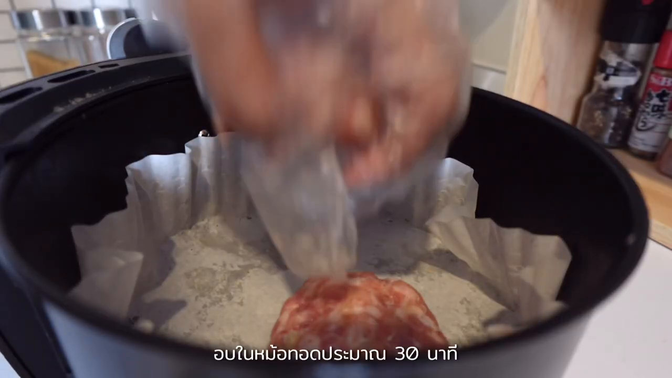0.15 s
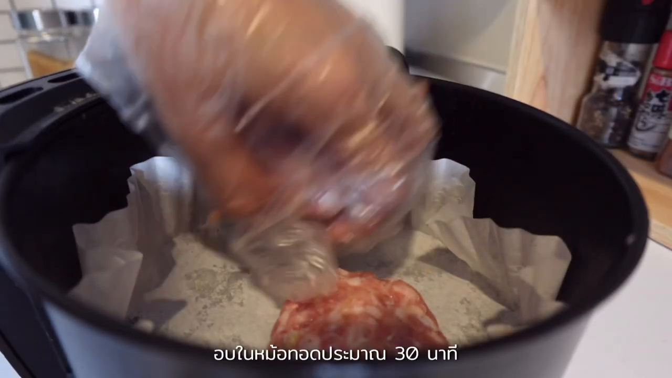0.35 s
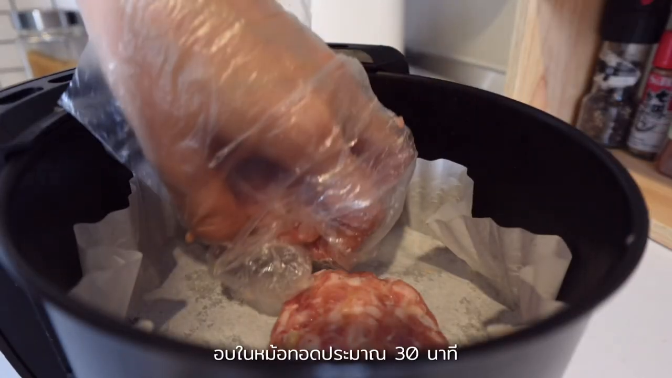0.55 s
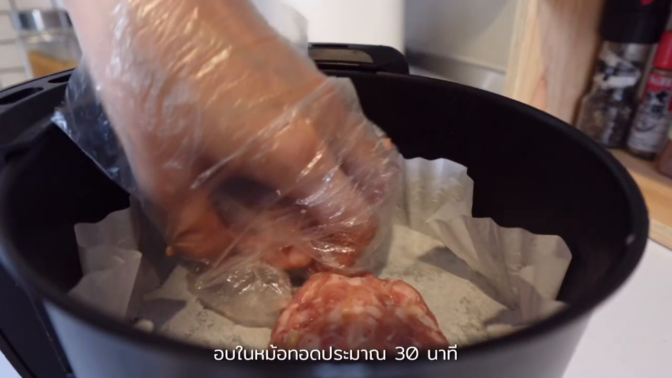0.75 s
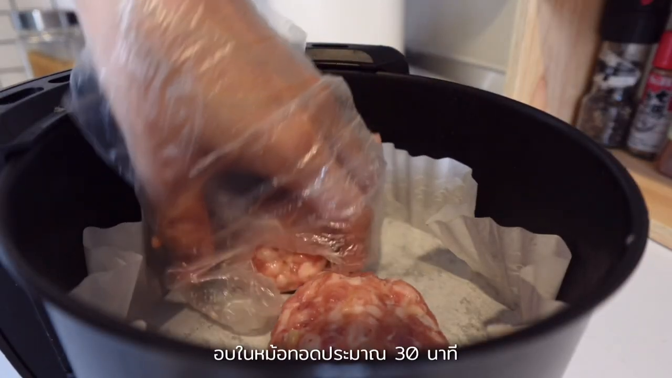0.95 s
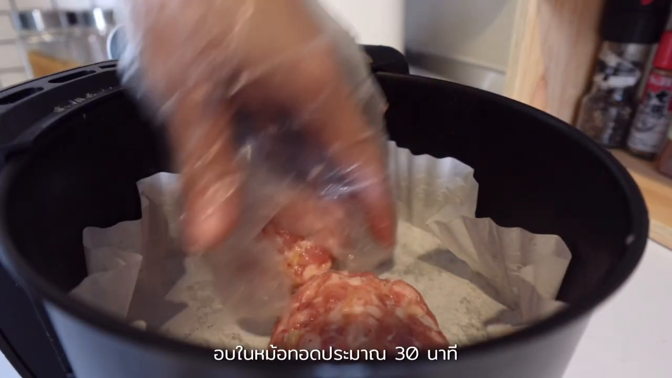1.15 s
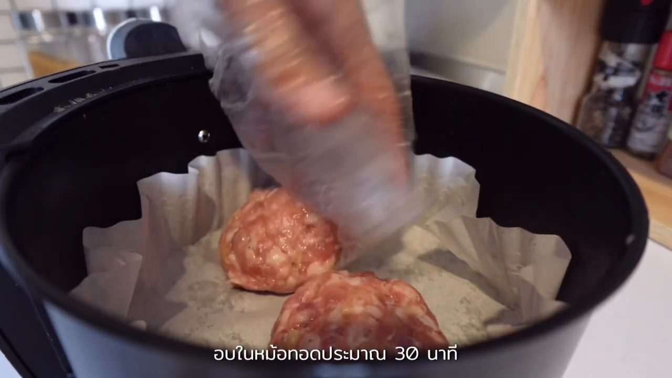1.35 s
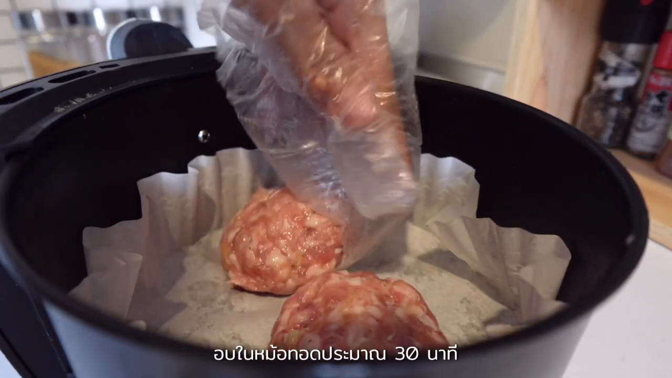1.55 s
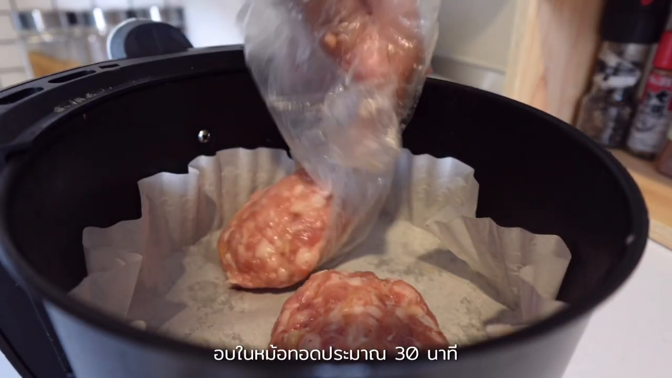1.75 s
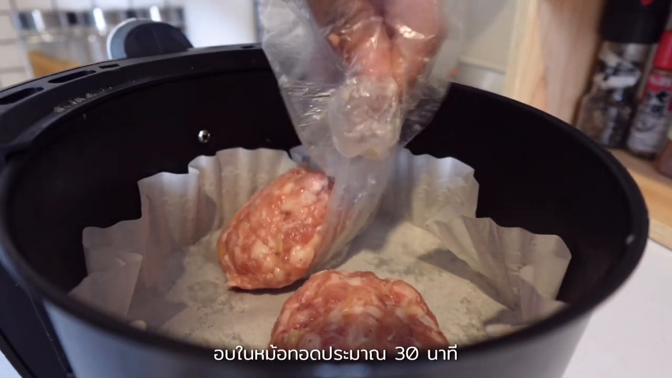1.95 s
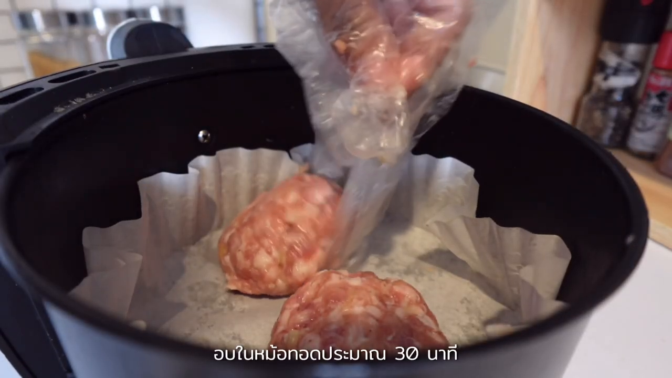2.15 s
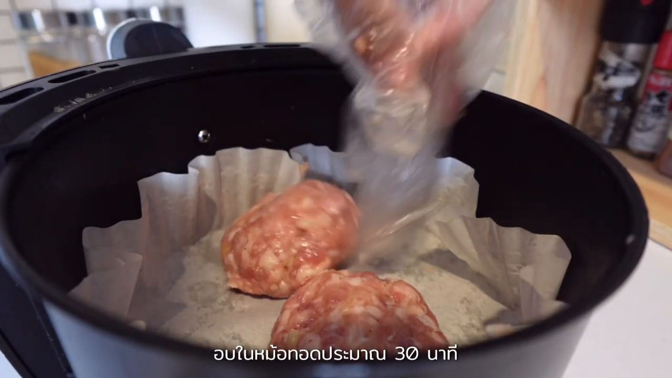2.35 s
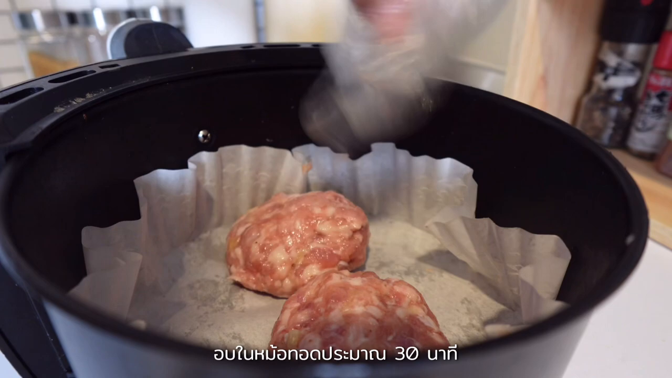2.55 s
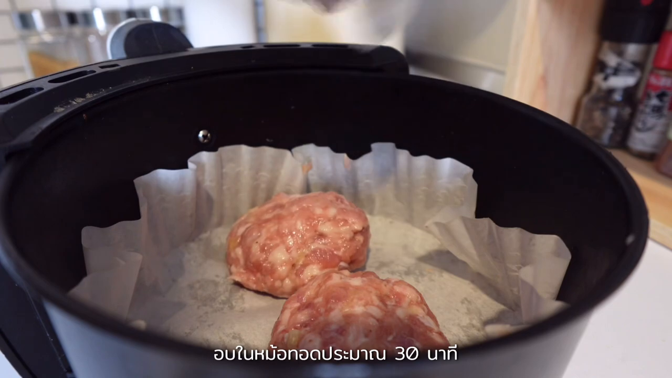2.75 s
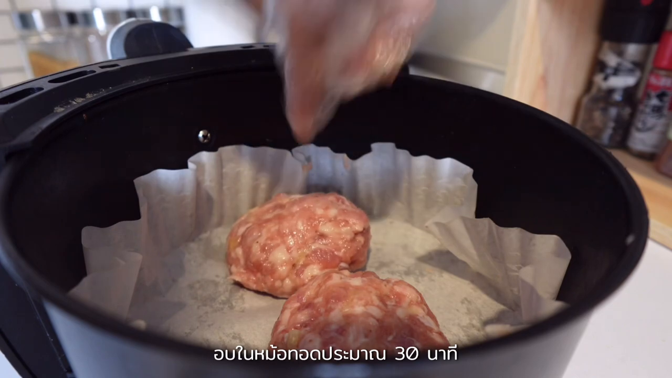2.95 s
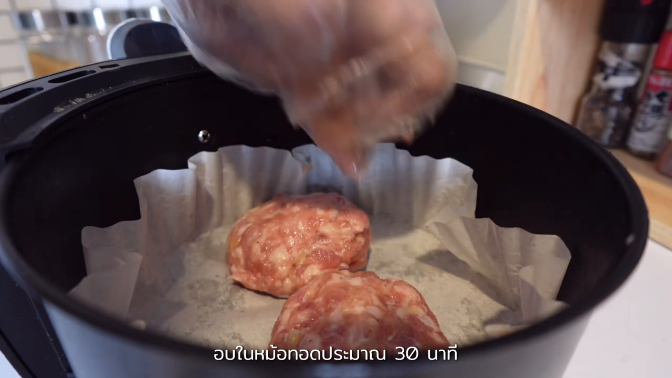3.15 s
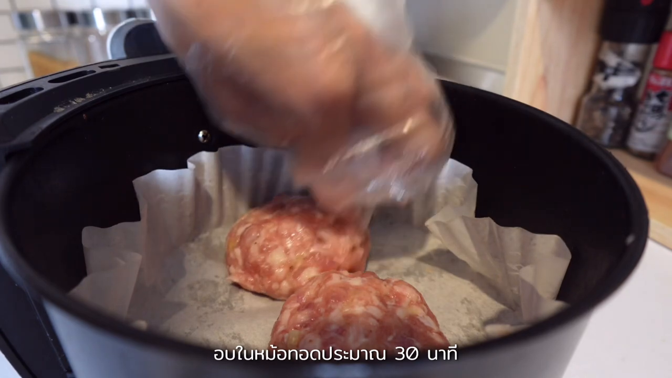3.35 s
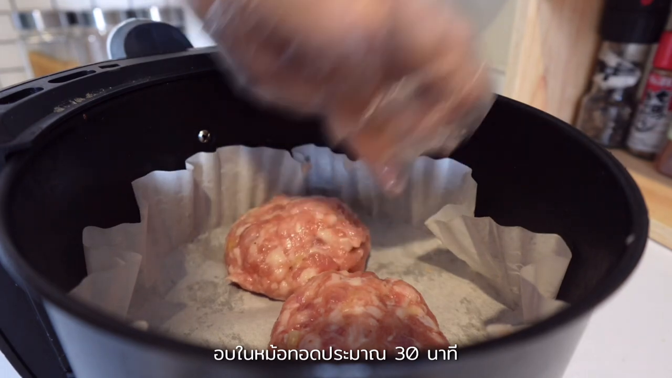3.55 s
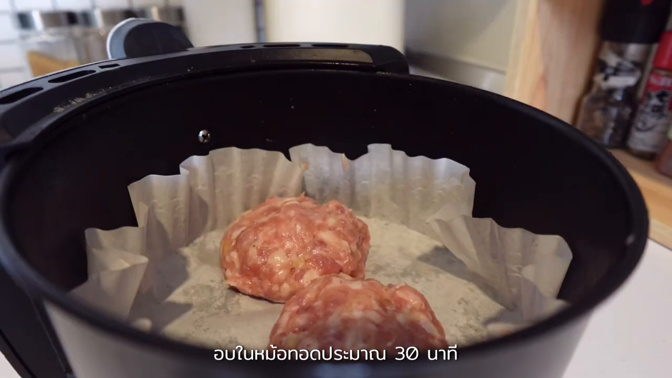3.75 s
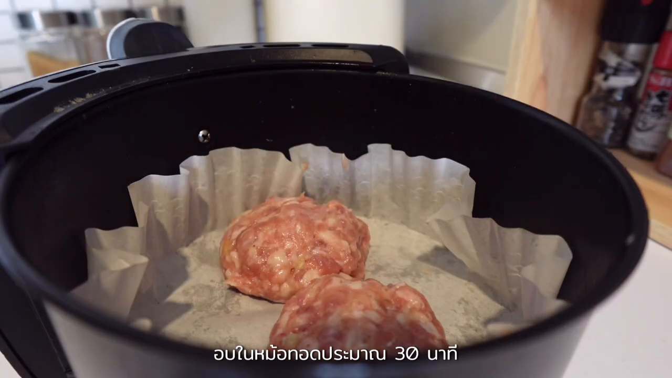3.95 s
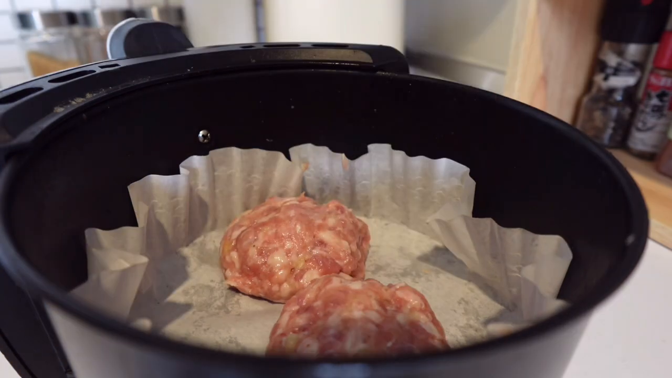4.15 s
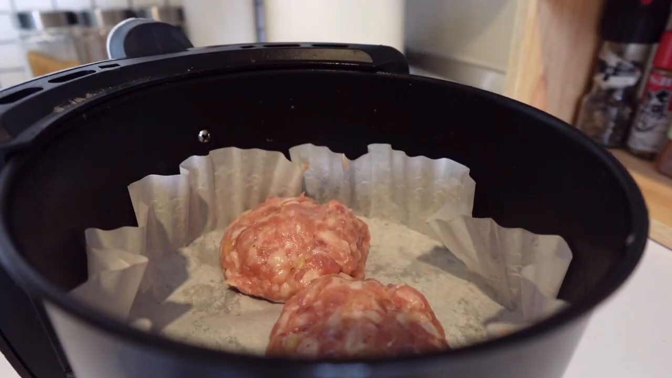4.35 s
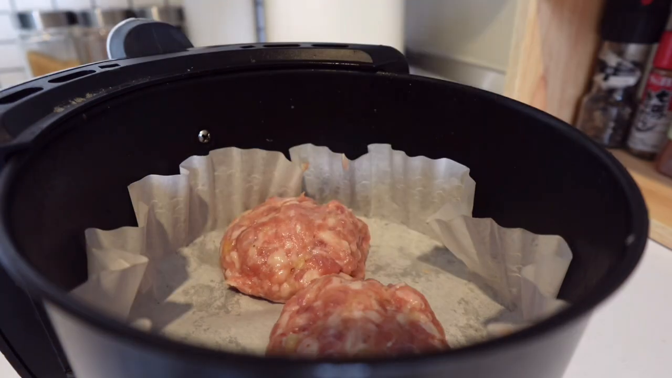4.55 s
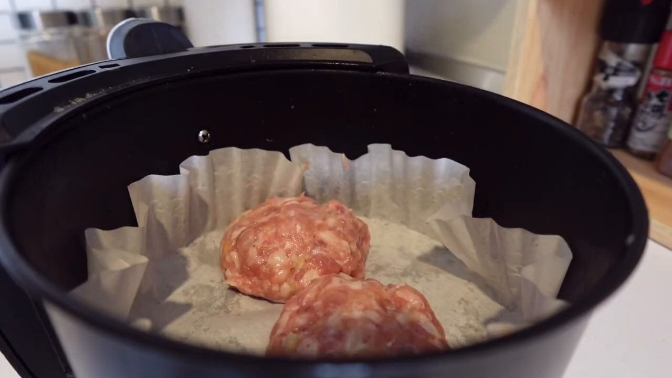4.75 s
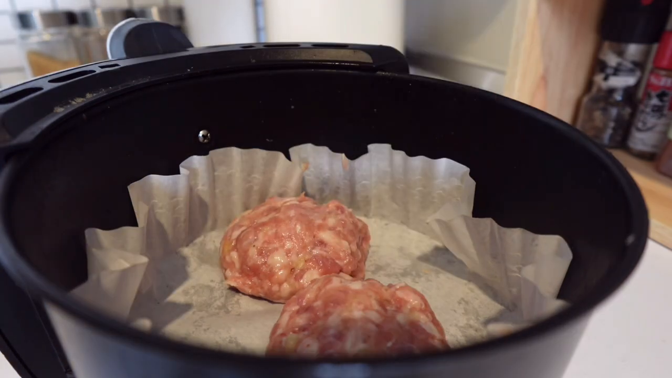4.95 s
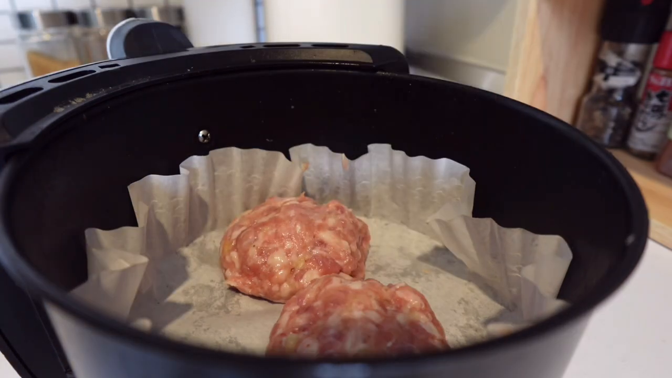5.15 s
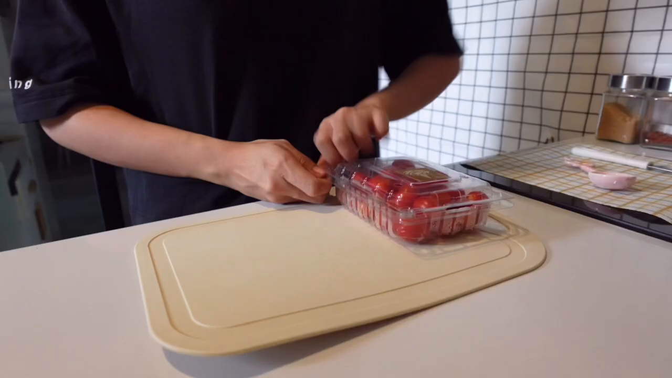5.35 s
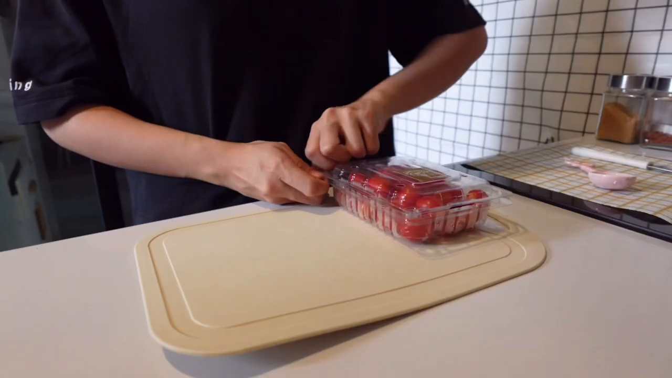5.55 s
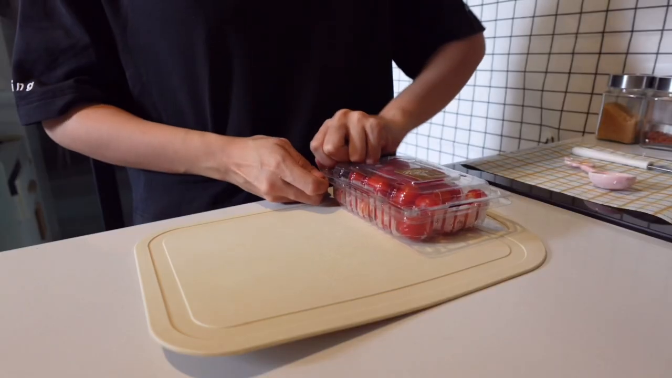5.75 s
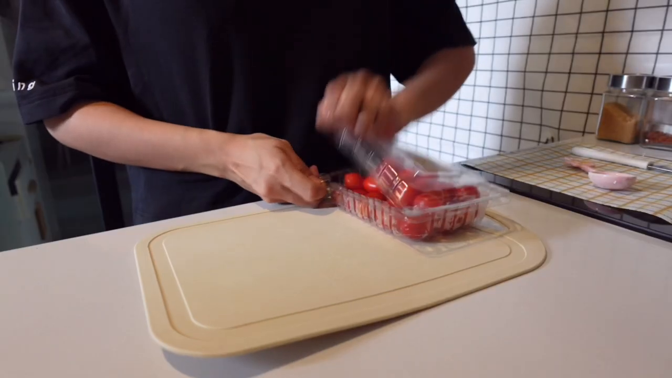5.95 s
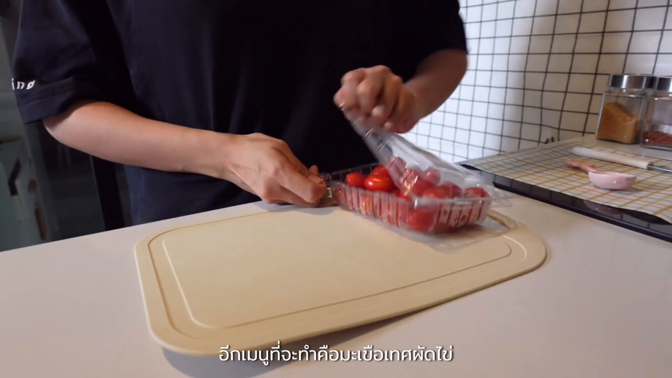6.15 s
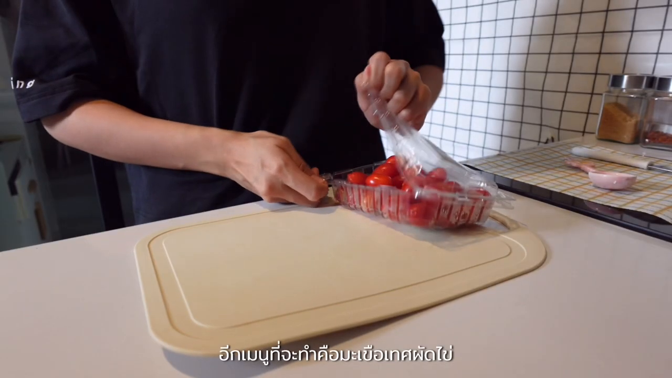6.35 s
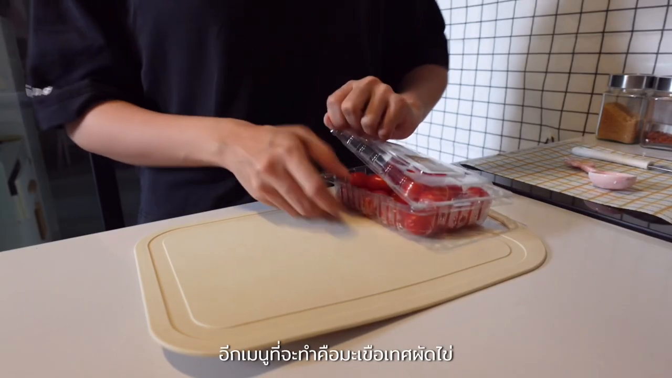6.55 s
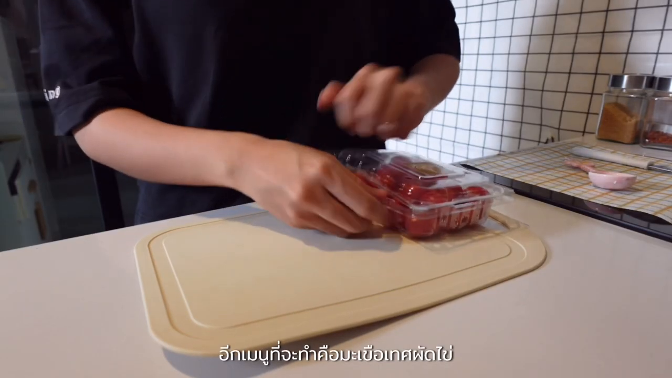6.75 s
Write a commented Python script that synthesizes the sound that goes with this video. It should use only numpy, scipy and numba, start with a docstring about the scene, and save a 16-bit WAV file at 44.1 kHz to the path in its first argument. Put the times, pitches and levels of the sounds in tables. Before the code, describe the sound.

Thin plastic gloves crinkle softly over a kitchen hum, then a plastic box is opened with loud, sharp pops and clicks.

```python
"""First a hand in a thin plastic glove sets a meatball on baking paper in an air-fryer pot. The plastic
crinkles as it buckles, folds snap, and the hand pulls away, leaving only the humming kitchen.
At about 5.4 seconds the scene changes to a noisier one: a plastic box of tomatoes is popped open,
its lid is creased back and dropped shut, and the tomatoes bump inside. The box sets the tiled room
ringing; a limiter turns down the loudest pops, so the echo swells up behind them."""
import sys
import numpy as np
from scipy import signal
from scipy.fft import rfft, irfft
from scipy.io import wavfile
from scipy.ndimage import uniform_filter1d, minimum_filter1d
from numba import njit

SR = 44100
rng = np.random.default_rng(int(sys.argv[2]) if len(sys.argv) > 2 else 0)


def pcm_store(signal):
    """Save signal as 16-bit PCM."""
    levels = np.round(np.clip(np.atleast_2d(signal), -1, 1) * 32767)
    wavfile.write(sys.argv[1], SR, levels.astype(np.int16).T)


N = 304290
T = np.arange(N) / SR
HZ = np.maximum(np.arange(N // 2 + 1) * SR / N, 1)

# The hand reaches in, sets the meat down, lets go and leaves. Each row: time in seconds, level in dB.
RUSTLE_LEVELS = [(0, -51), (.22, -50.5), (.3, -42), (.41, -41), (.53, -47.5), (.78, -40.5), (.845, -34.5),
                 (.9, -42.5), (.99, -43.5), (1.14, -39), (1.44, -45.5), (1.66, -40), (1.76, -47),
                 (2.27, -46.5), (2.35, -38.5), (2.48, -41.5), (2.54, -35), (2.84, -37), (2.88, -39.5),
                 (3.26, -56.5), (3.36, -50), (3.64, -68.5), (4, -100)]
# Fingers rub off sticky meat. Each row: time in seconds, level in dB.
FINGER_RUBS = [(1.49, -47), (1.645, -45), (1.895, -44), (1.97, -45), (2.07, -46), (2.185, -44),
               (2.815, -33), (2.945, -42.5), (3.115, -46.5), (3.69, -62), (3.735, -54.5)]
# Dragging on meat and paper adds low tones. Each row: time in seconds, dB relative to the rustle.
DRAG_LEVELS = [(0, -12), (.2, -5), (.88, -2), (1.65, -4), (1.85, -7.5), (2.35, -7.5), (2.41, -2),
               (2.56, -9.5), (3.1, -9.5), (3.4, 0.5), (3.6, -9)]
# Single wrinkles stand out of a slow rustle. Each row: rustle level in dB, wrinkles' relative dB.
WRINKLE_SHARE = [(-56, -7.5), (-40, -18)]
# The tone of the plastic film. Each row: frequency in Hz, relative level in dB.
FILM_TONE = [(180, -49), (300, -6), (343, -7.5), (470, -12.5), (565, -9.5), (994, -7.5), (1340, -2.5),
             (1690, -1.5), (2280, 0), (3460, -0.5), (6850, -2), (14500, -3.5), (16000, -11)]
# The air in the pot rings. Each row: pitch in Hz, width in Hz, boost in dB.
POT_RESONANCES = [(570, 57, 4), (1355, 86, 4), (2080, 450, 3)]


def glove_rustle(let_go_s=1.055, slacken_s=0.1, taut_db=-4, slack_db=0.53, rub_s=0.018):
    """Thin film buckles: it is dull while stretched around the meat and sizzles once it hangs slack."""
    rub_power = sum(undb(db) ** 2 * np.exp(-((T - s) / rub_s) ** 2) for s, db in FINGER_RUBS)
    effort = np.sqrt(gain_curve(RUSTLE_LEVELS) ** 2 + rub_power)
    released = np.clip((T - let_go_s) / slacken_s, 0, 1)
    fine = unit(crinkle(rate=20000, spread_db=0.75, clump_db=1.23, clump_s=0.007))
    wrinkles = unit(crinkle(rate=130, spread_db=-1.5, clump_db=5.0, clump_s=0.064))
    share = undb(np.interp(20 * np.log10(effort), *np.transpose(WRINKLE_SHARE)))
    film = colour((fine + share * wrinkles) / np.hypot(1, share), FILM_TONE, POT_RESONANCES)
    body = unit(band(film, 403, 2090, order=3)) * gain_curve(DRAG_LEVELS)
    middle = unit(band(film, 2388, 7060, order=3))
    sizzle = unit(band(film, 6980, 16000, order=3)) * undb(taut_db + (slack_db - taut_db) * released)
    rustle = (middle - body - sizzle) * effort
    return rustle + pot_echo(rustle, released)


def pot_echo(x, lifted, delay_s=0.001454, deep_gain=0.17, lifted_gain=0.053):
    """The pot wall sends sound straight back, making it hollow; less so once the hand lifts."""
    return (deep_gain + (lifted_gain - deep_gain) * lifted) * np.interp(T - delay_s, T, x)


# Folds in the glove and paper. Each row: start in seconds, level in dB, pitch in Hz.
FOLD_SNAPS = [(.829, -17.5, 2700), (.8436, -12.5, 2980), (.854, -12.5, 2900), (.8655, -16, 1700),
              (.9535, -25, 3300), (1.7215, -18, 1710), (1.7223, -18, 4530), (1.955, -21, 7050),
              (2.4621, -15, 1900), (2.465, -16, 3900), (2.804, -25, 2640), (2.836, -20, 2800),
              (3.4125, -23.5, 2100), (3.569, -38, 4500), (3.6855, -35, 5530), (3.729, -29.5, 4300)]


def fold_snaps(ring_cycles=55, crack_db=-4):
    """Folds snap through inside the pot; small, high ones die away soonest."""
    snaps = np.zeros(N)
    for s, db, hz in FOLD_SNAPS:
        t60 = ring_cycles / hz
        narrow = burst(hz * 0.81, hz * 1.26, t60)
        wide = burst(hz * 0.2, hz * 2.2, t60)
        add(snaps, s, undb(db) * (narrow + 0.72 * wide))
        add(snaps, s, undb(db + crack_db) * crack(hz * 0.5, hz * 3.9, lag_s=0.000632))
    return colour(snaps, [(300, -23), (600, -3), (950, -7), (1500, -5), (16000, -1.0)], POT_RESONANCES)


def squeak(start_s=3.61, length_s=0.054, hz=2100, db=-54):
    """A brief, faint rubbing squeak."""
    envelope = np.interp(T, [start_s, start_s + length_s / 5, start_s + length_s], [0, 1, 0])
    return undb(db) * envelope * unit(band(rng.standard_normal(N), hz * 0.91, hz * 1.07))


# The notes of the box's shell. Each row: base pitch in Hz, relative level in dB, fade time in seconds.
SHELL_NOTES = [(298, -25, 0.045), (407, -13.5, 0.009), (724, -27, 0.0036), (1179, -6, 0.039),
               (1257, -1.5, 0.036), (1335, -3.5, 0.036), (1660, -7, 0.024), (2247, -4, 0.019),
               (2395, 0.5, 0.01), (3390, -6, 0.02)]
# Pops of the box. Each row: start in seconds, level in dB, the crack's relative dB,
# contact time in seconds, pitch multiplier from the shell's tension.
BOX_POPS = [(5.577, -2, 3.5, 0.00022, 0.97), (5.9054, -7, 15.5, 0.00019, 1.04),
            (6.7205, -13, -32, 0.0003, 1.03), (6.7226, -15, 0.5, 0.0012, 0.93)]


def box_pops():
    """The whole shell flexes and rings as a catch lets go or the lid lands; short contacts are brighter."""
    out = np.zeros(N)
    for s, db, crack_db, contact_s, tension in BOX_POPS:
        shell = sum((-1) ** k * undb(note_db) * ring(hz * tension, t60) / np.hypot(1, hz * contact_s)
                    for k, (hz, note_db, t60) in enumerate(SHELL_NOTES))
        add(out, s, undb(db) * (shell + undb(crack_db) * shell_crack(1 / contact_s)))
    return out


def shell_crack(cutoff_hz):
    """The shell's crowded high notes blur into one short crack, weaker above the cutoff."""
    low_pass = signal.butter(1, min(cutoff_hz, SR / 4), fs=SR, output="sos")
    sound = signal.sosfilt(low_pass, crack(750, 12500, lag_s=0.0026))
    return sound / np.abs(sound).max()


# Creases in the lid. Each row: start in seconds, level in dB, pitch in Hz.
LID_CREASES = [(5.371, -26.5, 2630), (5.405, -35, 7200), (5.5528, -19, 5260), (5.576, -10, 7300),
               (5.656, -21, 6800), (5.686, -16.5, 7100), (5.8778, -9.5, 2910), (5.8767, -9, 5000),
               (6.198, -5, 3520), (6.2636, 1, 4190), (6.3845, -20, 5520), (6.4775, -21.5, 3140),
               (6.7295, -16.5, 8250), (6.8648, -31, 3470)]


def lid_creases(ring_cycles=23, db_per_octave=7.5):
    """Each crease clicks over and rings one panel: small panels crack more, hard snaps ring more."""
    out = np.zeros(N)
    for s, db, hz in LID_CREASES:
        crack_db = -16.5 + db_per_octave * np.log2(hz / 4060) - 0.35 * db
        add(out, s, undb(db) * band(ring(hz, ring_cycles / hz), hz * 0.94, 21000))
        add(out, s, undb(db + crack_db) * crack(3400, 14200, lag_s=0.0014))
    return out


# Tomatoes bumping. Each row: start in seconds, level in dB, pitch in Hz.
TOMATO_BUMPS = [(5.53, -29, 684), (6.09, -26.5, 1320), (6.19, -22, 870), (6.224, -26.5, 1260),
                (6.323, -21.5, 875), (6.469, -25.5, 1420), (6.484, -25.5, 1260), (6.513, -23.5, 1440),
                (6.864, -26, 1310)]


def tomato_bumps():
    """Tomatoes knock dully in the tray."""
    out = np.zeros(N)
    for s, db, hz in TOMATO_BUMPS:
        add(out, s, undb(db) * (0.53 * ring(hz, t60=0.023) + 0.64 * burst(830, 1420, t60=0.02)))
    return out


def lid_slide(start_s=6.714, rise_s=0.0023, t60=0.034, db=-23.5):
    """The lid scrapes over the rim just before it lands."""
    scrape = unit(band(crinkle(rate=5900, spread_db=1.5, clump_db=-3.5, clump_s=0.002), 780, 9700))
    since = np.maximum(T - start_s, 0)
    envelope = np.minimum(since / rise_s, 1) * np.exp(-np.log(1000) * since / t60)
    return undb(db) * envelope * scrape


# The kitchen's echo. Each row: frequency in Hz, fade time in seconds, relative level in dB.
ECHO_BANDS = [(248, 0.35, 2), (970, 0.22, 3), (2980, 0.26, 3.5), (6800, 0.26, 3), (13600, 0.2, 5.5)]


def kitchen_echo(x, wet_db=-6.5, width=0.22, build_s=0.00054):
    """Reflections from counter and tiles thicken, then die away, the bass lasting longest."""
    t = T[:SR // 2]
    hz, t60, db = np.transpose(ECHO_BANDS)
    edges_hz = np.geomspace(125, 16000, 8)
    tail = np.zeros((2, len(t)))
    for lo, hi in zip(edges_hz, edges_hz[1:]):
        fade_s, gain_db = (np.interp(np.log(lo * hi) / 2, np.log(hz), column) for column in (t60, db))
        noise = band(rng.standard_normal(tail.shape), lo, hi, order=3)
        tail += undb(gain_db) * noise * np.exp(-np.log(1000) * t / fade_s)
    tail *= 1 - np.exp(-t / build_s)
    mid, side = (signal.fftconvolve(x, echo / np.linalg.norm(echo))[:N] for echo in tail)
    return undb(wet_db) * stereo(mid, width * side)


def from_the_right(x, pan_db=0.27, lag_s=0.000006):
    """Sound from a little right of centre reaches the left side later and weaker."""
    left = irfft(rfft(x[0]) * np.exp(-2j * np.pi * HZ * lag_s), N)
    return np.array([undb(-pan_db) * left, undb(pan_db) * x[1]])


# The appliances' tones. Each row: pitch in Hz, base level in dB.
HUM_TONES = [(123.8, -70.5), (199.2, -69), (500.6, -73.5), (646.0, -75.5), (1367, -69.5), (3413, -83),
             (9485, -88), (9701, -77.5), (10061, -91), (13927, -89)]


def appliance_hum(waver_hz=1.6):
    """Appliances hum and whine, each tone wavering a little in pitch."""
    knots = np.linspace(0, T[-1], 60)
    hum = np.zeros(N)
    for hz, db in HUM_TONES:
        pitch_hz = hz + waver_hz * np.interp(T, knots, rng.standard_normal(len(knots)))
        hum += np.sqrt(2) * undb(db) * np.sin(2 * np.pi * np.cumsum(pitch_hz) / SR)
    return hum


def fan_noise(tone, resonances, db, bass_width, treble_width):
    """A fan's rush fills the room; the bass is nearly alike in both ears."""
    mid, side = (unit(colour(noise, tone, resonances)) for noise in rng.standard_normal((2, N)))
    return undb(db) * stereo(mid, bass_width * side + treble_width * band(side, 225, 9000))


# The fan's tone beside the pot. Each row: frequency in Hz, relative level in dB.
POT_FAN_TONE = [(25, -34), (45, -17), (70, -10), (140, -4.5), (230, -2), (330, -10), (600, -14),
                (880, -20.5), (1300, -14.5), (2000, -23.5), (4000, -29.5), (8000, -36), (16000, -39.5)]
# The fan's tone beside the box. Each row: frequency in Hz, relative level in dB.
BOX_FAN_TONE = [(25, -38), (70, -23), (140, -9), (220, -2), (330, -9.5), (600, -14.5), (880, -18),
                (1300, -14), (2300, -18.5), (4000, -24.5), (8000, -35.5), (12000, -42), (16000, -47)]
# The room's low, booming notes. Each row: pitch in Hz, width in Hz, boost in dB.
ROOM_BOOM = [(71.5, 6.9, 12.5), (126.8, 12.5, 9.5), (231.7, 19.4, 7)]
# Narrow bands of appliance hiss. Each row: pitch in Hz, width in Hz, boost in dB.
HISS_BANDS = [(3367, 59, 11), (9900, 790, 13.5)]
# The background beside the pot grows louder. Each row: time in seconds, level change in dB.
BACKGROUND_SWELL = [(0, -5.5), (3.6, -5.5), (3.78, 1), (5.3, 0)]


def background(scene_change_s=5.365):
    """Fan and hum beside the pot give way to a louder, plainer rush beside the box."""
    hum = appliance_hum()
    by_pot = fan_noise(POT_FAN_TONE, ROOM_BOOM + HISS_BANDS, db=-55.5, bass_width=0.18, treble_width=0.17)
    by_box = fan_noise(BOX_FAN_TONE, ROOM_BOOM, db=-41, bass_width=0.076, treble_width=0.15)
    return np.where(T < scene_change_s, (by_pot + hum) * gain_curve(BACKGROUND_SWELL), by_box)


def crinkle(rate, spread_db, clump_db, clump_s):
    """Tiny buckles of plastic, about `rate` a second, uneven in size and swelling in clumps."""
    knots = np.arange(0, T[-1] + clump_s, clump_s)
    sizes = rng.standard_normal(N) * undb(spread_db * np.minimum(rng.exponential(size=N), 5))
    buckles = sizes * (rng.random(N) < rate / SR)
    return buckles * undb(clump_db * np.interp(T, knots, rng.standard_normal(len(knots))))


def crack(lo_hz, hi_hz, lag_s):
    """A snap through a thin sheet: bending waves bring the treble first, and 1 kHz lag_s later."""
    hz = np.fft.rfftfreq(SR // 8, 1 / SR)
    sweep = irfft(np.exp(-4j * np.pi * lag_s * hz / np.sqrt(hz / 1000 + 1e-9)))
    sound = band(sweep, lo_hz, hi_hz)
    return sound / np.abs(sound).max()


def ring(hz, t60):
    """One struck note, dying away."""
    return np.sin(2 * np.pi * hz * T[:SR // 8]) * fade(t60)


def burst(lo_hz, hi_hz, t60):
    """A dying puff of noise."""
    noise = band(rng.standard_normal(SR // 8) * fade(t60), lo_hz, hi_hz)
    return noise * np.sqrt(np.sum(fade(t60) ** 2) / np.sum(noise ** 2)) / 2


def fade(t60):
    """An eighth of a second of fading; t60 is the fade time, the seconds it takes to fall 60 dB."""
    return np.exp(-np.log(1000) * T[:SR // 8] / t60)


def colour(x, tone, resonances):
    """Shape a sound with a (Hz, dB) outline, and boost it at each resonance."""
    hz, db = np.transpose(tone)
    outline = np.interp(np.log(HZ), np.log(hz), db)
    boost = sum(gain / (1 + (2 * (HZ - centre) / width) ** 2) for centre, width, gain in resonances)
    return irfft(rfft(x) * undb(outline + boost), N)


def band(x, lo_hz, hi_hz, order=2):
    """Keep the sound between two frequencies."""
    band_pass = signal.butter(order, [lo_hz, min(hi_hz, SR / 2 - 1000)], "band", fs=SR, output="sos")
    return signal.sosfilt(band_pass, x)


def undb(db):
    """Turn decibels into a multiplier."""
    return 10 ** (np.asarray(db) / 20)


def unit(x):
    """Scale to an average power of 1."""
    return x / np.sqrt(np.mean(x ** 2))


def gain_curve(table):
    """Join (seconds, dB) rows into one multiplier per sample."""
    return undb(np.interp(T, *np.transpose(table)))


def add(track, s, sound):
    """Mix a sound into a track at s seconds."""
    i = int(s * SR)
    track[i:i + len(sound)] += sound[:N - i]


def stereo(mid, side):
    """Left and right from what the ears share (mid) and what sets them apart (side)."""
    return np.array([mid + side, mid - side])


def scene():
    """The glove is close, with no room echo; the box stands further off, in the sound of the room."""
    box = band(box_pops() + lid_creases() + tomato_bumps(), 170, 14000) + lid_slide()
    glove = glove_rustle() + fold_snaps() + squeak()
    return glove + from_the_right(box + kitchen_echo(box)) + background()


@njit
def peak_hold(x, keep):
    """Follow peaks at once and let go slowly."""
    out, held = np.empty(len(x)), 0.
    for i in range(len(x)):
        held = max(x[i], held * keep)
        out[i] = held
    return out


def record(dry, ceiling_db=-8, release_s=0.023, top_hz=16100):
    """A limiter holds the pops down and recovers during their echo; the highest treble is cut."""
    peak = peak_hold(np.abs(dry).max(axis=0), np.exp(-1 / (release_s * SR)))
    gain = np.minimum(1, undb(ceiling_db) / (peak + 1e-9))
    gain = uniform_filter1d(minimum_filter1d(gain, size=65), size=65)  # ease down just before each peak
    return signal.sosfilt(signal.ellip(10, 0.2, 80, top_hz, fs=SR, output="sos"), dry * gain)


dry = scene()
out = record(dry)
pcm_store(out)
```